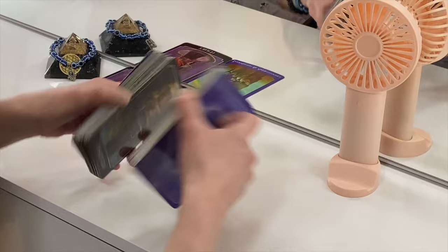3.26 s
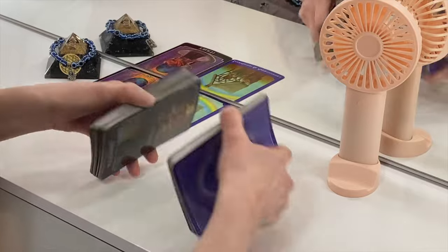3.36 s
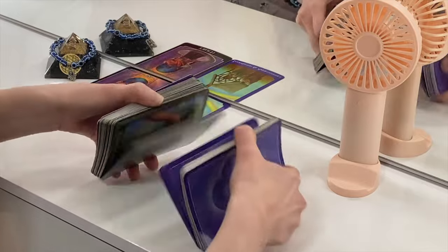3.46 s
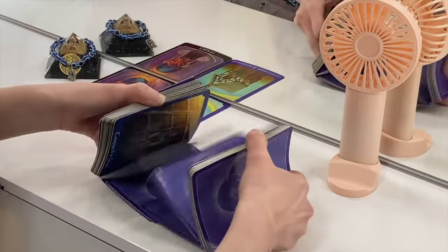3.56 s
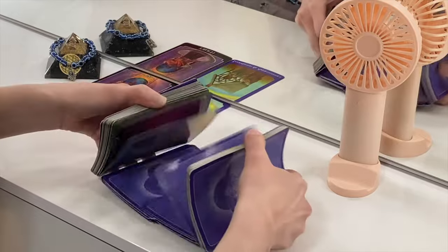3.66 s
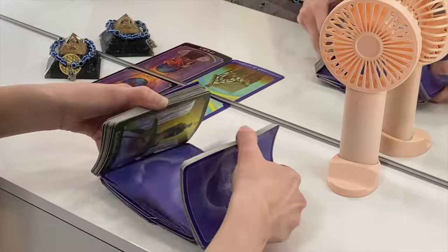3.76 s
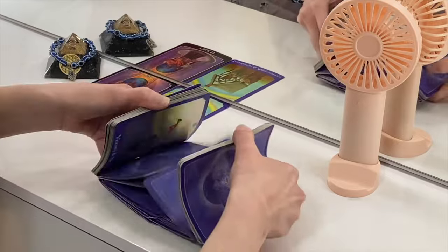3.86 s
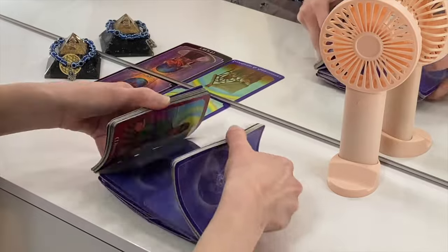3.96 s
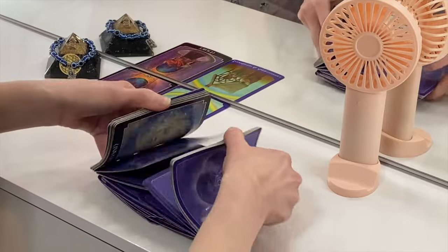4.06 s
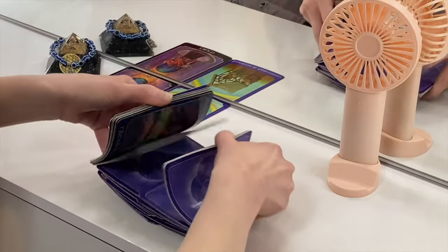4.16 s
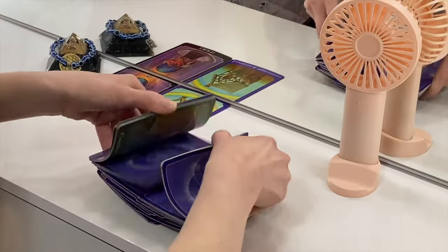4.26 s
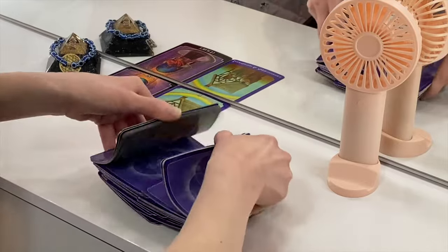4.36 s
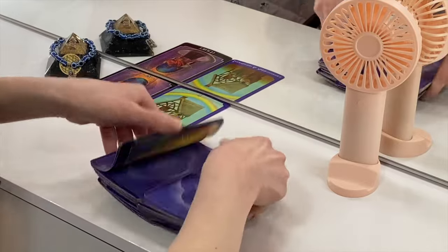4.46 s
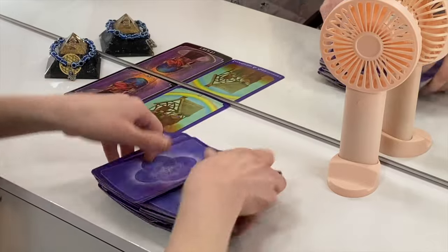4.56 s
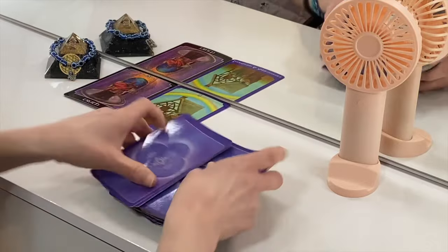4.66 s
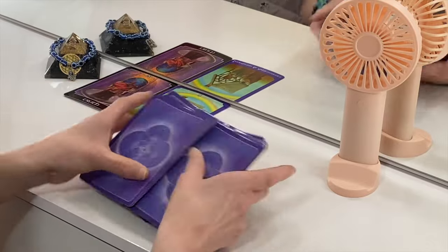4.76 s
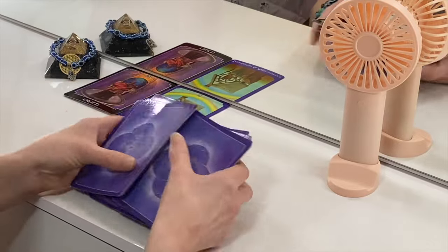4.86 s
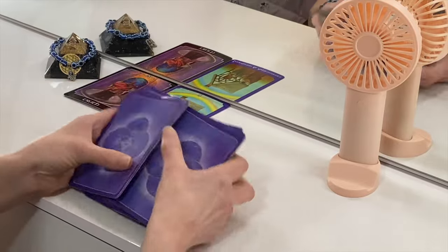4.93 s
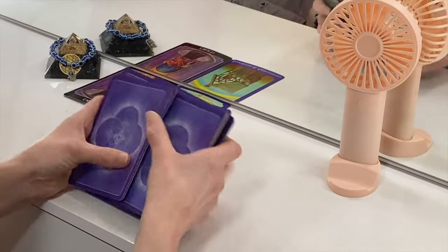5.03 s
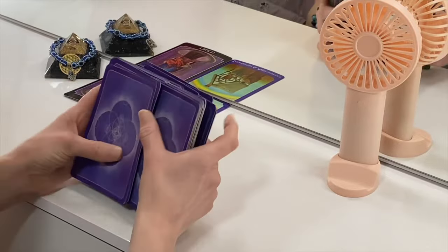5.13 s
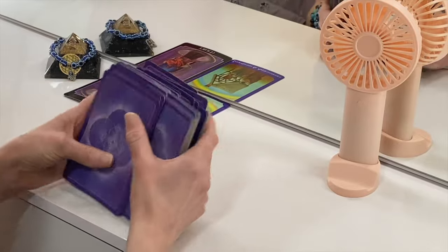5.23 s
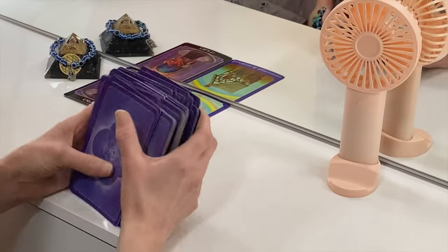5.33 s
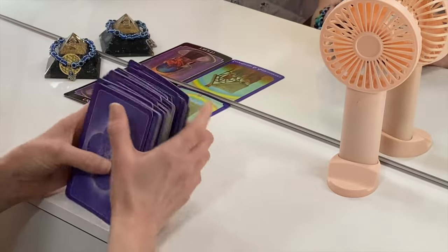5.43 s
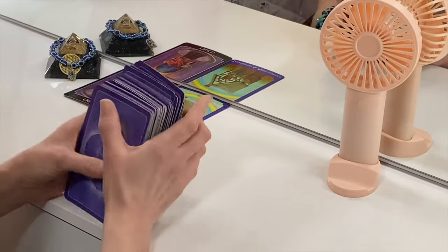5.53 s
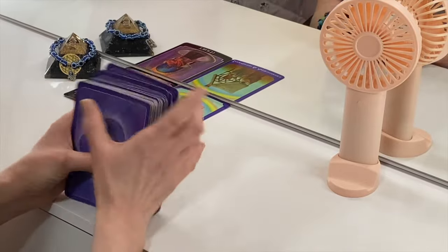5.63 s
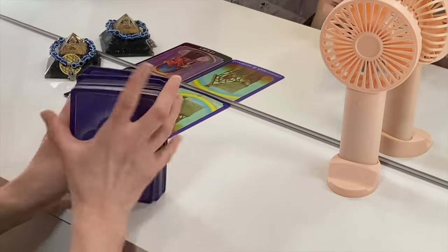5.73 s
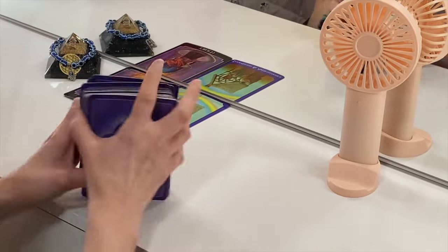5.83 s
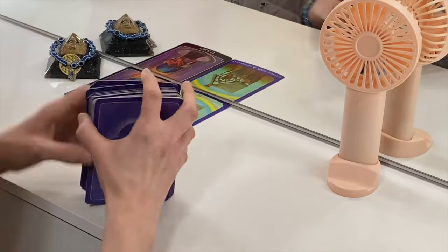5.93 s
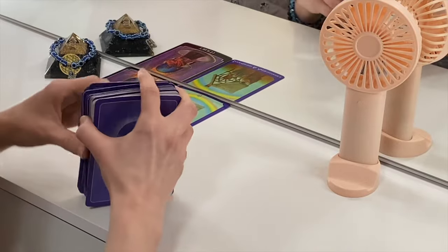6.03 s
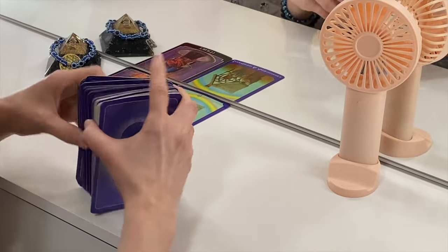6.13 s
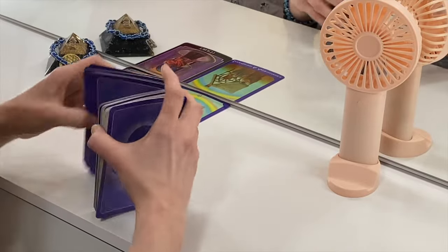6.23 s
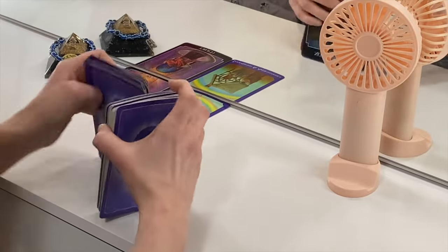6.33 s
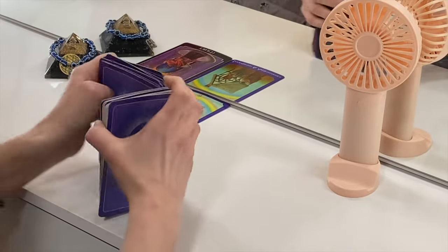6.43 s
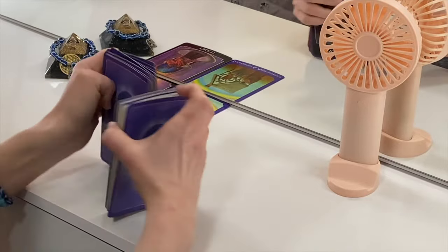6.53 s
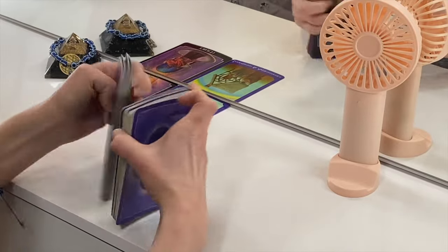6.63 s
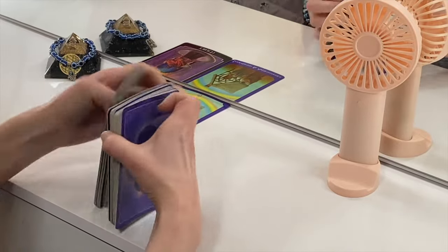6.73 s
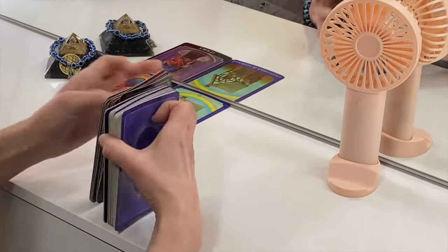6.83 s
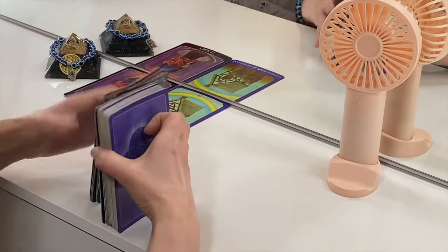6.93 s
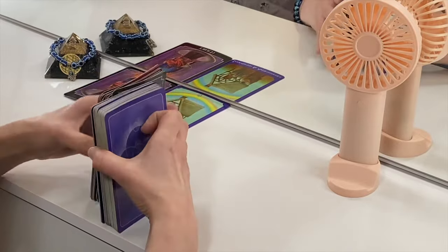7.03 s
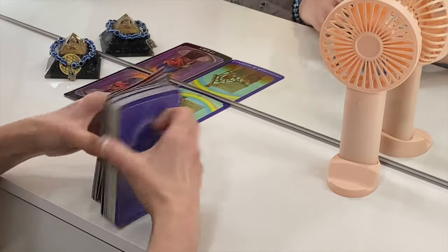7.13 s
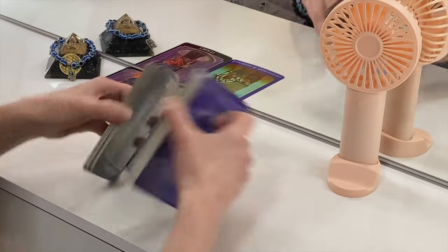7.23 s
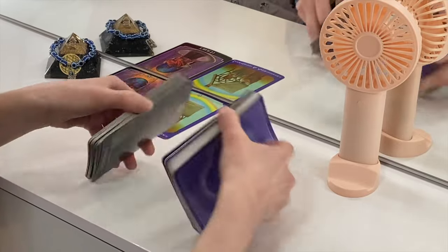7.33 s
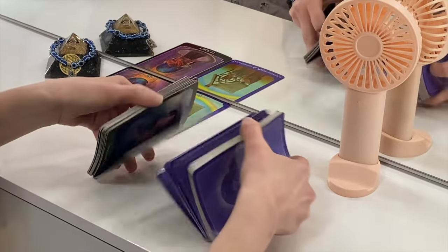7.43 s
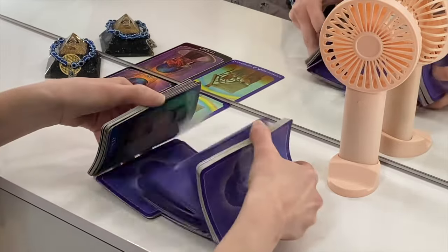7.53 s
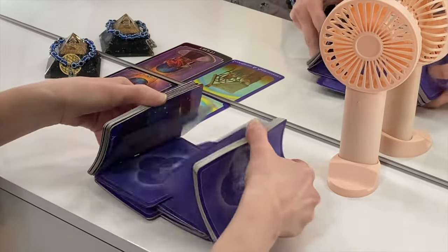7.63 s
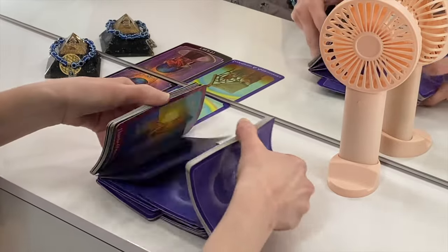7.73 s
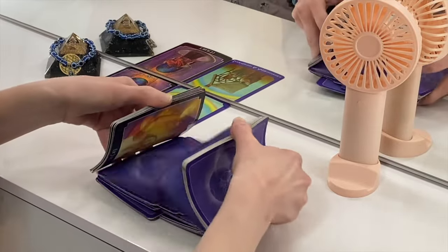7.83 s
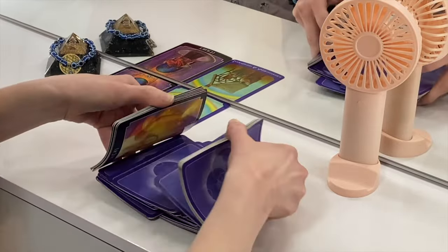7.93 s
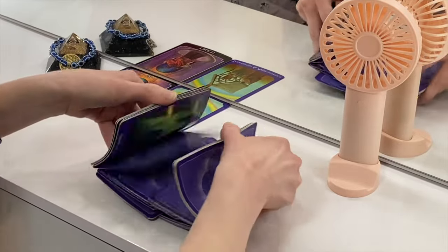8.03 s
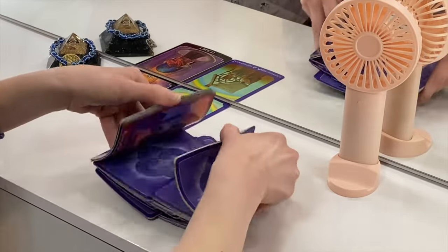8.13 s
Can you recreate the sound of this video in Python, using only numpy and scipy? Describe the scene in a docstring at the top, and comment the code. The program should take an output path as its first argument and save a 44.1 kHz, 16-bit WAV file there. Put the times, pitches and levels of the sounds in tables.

```python
"""Card deck on a table

A thick deck of stiff cards is riffled, squared and tapped on a hard table top, close up in a quiet room.
Each slap is a short flutter of clicks that rings the card and cracks in the treble.
Thuds are short rattling pushes that ring the pack and the table; sliding is gritty noise with bright ticks.
The room answers briefly in decaying noise bands; faint hiss and a low rumble lie underneath."""
import sys
import numpy as np
from scipy import signal
from scipy.fft import rfft, irfft, next_fast_len
from scipy.io import wavfile
from scipy.ndimage import uniform_filter1d

SR = 44100
rng = np.random.default_rng(int(sys.argv[2]) if len(sys.argv) > 2 else 0)


def amplitude_ratio(level_db):
    """Convert a level in decibels to the matching linear amplitude (field) ratio."""
    exponent = np.asarray(level_db, float) / 20
    return 10 ** exponent


def generate_wav(signal):
    """Clip the signal to [-1, 1] and save it as 16-bit WAV at the path in sys.argv[1]."""
    frames = np.transpose(np.atleast_2d(signal))
    scaled = np.clip(frames, -1, 1) * 32767
    pcm = np.round(scaled).astype(np.int16)
    wavfile.write(sys.argv[1], SR, pcm)


N = 361179
SPOTS = 6  # places on the table that share out the sounds


def level(x, db):
    """Sets the rms level."""
    return x * amplitude_ratio(db) / np.sqrt(np.mean(x ** 2))


def peak(x, db):
    """Sets the peak level."""
    return x * amplitude_ratio(db) / np.max(np.abs(x))


def steady(x, db, length_s):
    """Sets the rms level that the sound would have with all its energy spread over length_s."""
    return x * amplitude_ratio(db) / np.sqrt(np.sum(x ** 2) / (length_s * SR))


def colour(x, points):
    """Filters by (f/Hz, level/dB) points joined on a log axis, falling 18 dB per octave outside them."""
    hz, db = np.transpose(points)
    f = np.fft.rfftfreq(x.shape[-1], 1 / SR) + 1
    octaves_below = np.log2(np.maximum(hz[0] / f, 1))
    octaves_above = np.log2(np.maximum(f / hz[-1], 1))
    gain_db = np.interp(np.log(f), np.log(hz), db) - 18 * (octaves_below + octaves_above)
    return irfft(rfft(x) * amplitude_ratio(gain_db), x.shape[-1])


def ring(x, hz, width):
    """A two-pole resonance, gain near 1 at its centre; width in Hz."""
    r = np.exp(-np.pi * width / SR)
    return signal.lfilter([1 - r, 0, r - 1], [1, -2 * r * np.cos(2 * np.pi * hz / SR), r * r], x)


def decay_width(t60):
    """The bandwidth in Hz of a resonance that dies by 60 dB in t60 seconds."""
    return np.log(1000) / np.pi / t60


def lowpass(x, order, hz):
    """Takes the highs off, forward in time."""
    return signal.sosfilt(signal.butter(order, hz, fs=SR, output="sos"), x)


def grit(noise, spread_db):
    """Signed clicks of very uneven size, one chance each sample."""
    return noise[0] * amplitude_ratio(spread_db * noise[1])


# Slaps of card on card, from dull knocks of the whole pack to crisp snaps of one edge:
# [t/s, card level/dB, edge crack against card level/dB, flutter length/ms]
SLAPS = [(0.707, -69, -3, 12), (0.975, -75, 10, 2.1), (1.174, -68.5, -3, 3.6), (1.355, -50, -7, 6.3),
         (1.365, -36.5, -76, 2.7), (1.416, -41.5, -75, 4), (1.62, -45.5, -76, 2.7), (1.642, -37, -79, 3.9),
         (1.665, -37.5, -7.5, 1.15), (1.705, -33.5, -37, 1.9), (1.773, -39, -25.5, 18),
         (1.892, -43, -18, 5.8), (1.971, -62, 6, 1.1), (2.033, -60, 1.5, 6.6), (2.133, -36, -20.5, 5.9),
         (2.222, -41, -71, 2.9), (2.339, -55, -11, 7.8), (2.375, -25, -22, 5), (2.517, -44.5, -31, 3.2),
         (2.575, -34.5, -19.5, 0.84), (2.712, -56, -30, 8), (2.739, -45, -40, 3.5), (3.005, -65.5, -57, 12),
         (3.074, -58.5, -35, 2.1), (3.263, -49.5, 9.5, 0.51), (3.558, -29.5, -6, 5),
         (3.639, -34.5, -7.5, 1.8), (3.738, -44.5, 4.5, 1.7), (3.756, -41.5, -3, 1.3),
         (3.853, -43.5, 0.5, 1.6), (3.876, -21.5, -6.5, 3), (3.956, -26.5, -2, 2.1), (3.993, -27.5, 3, 1.4),
         (3.998, -23.5, -2, 2.1), (4.038, -33, -7, 3.5), (4.096, -44.5, 6.5, 4.4), (4.108, -29.5, -4, 4.3),
         (4.179, -60, 18, 1.3), (4.199, -36, -1.5, 6.3), (4.209, -40, -5, 4.4), (4.334, -33.5, 3.5, 10),
         (4.344, -23, -2.5, 2.7), (4.402, -35, 4, 6.7), (4.418, -21.5, 0, 3.7), (4.454, -17.5, 7, 0.56),
         (4.481, -17, -1.5, 1), (4.878, -52, -3.5, 9.5), (5.07, -47, -4.5, 5.7), (5.284, -32.5, -12, 4.7),
         (5.405, -31.5, -50, 1.9), (5.414, -29, -13, 1.34), (5.492, -42.5, -22, 5.9),
         (5.538, -18.5, -11, 1.25), (5.567, -25.5, -16, 2.85), (5.728, -37.5, -63.5, 2.2),
         (5.754, -46.5, -25, 3.5), (5.88, -57, -56, 5.7), (5.992, -45, -48.5, 8.2),
         (6.095, -50.5, -22.5, 4.6), (6.143, -48.5, -34, 6.9), (6.2, -49.5, -40, 16),
         (6.249, -34.5, -30.5, 9), (6.265, -27, -45, 0.65), (6.295, -33, -45, 1.8), (6.32, -72, 20, 1.5),
         (6.428, -34.5, -5.5, 4), (6.597, -46.5, -67, 2.8), (6.647, -38.5, -55, 1.9),
         (6.685, -39, -38, 4.1), (6.812, -42, -18, 8.4), (6.868, -35.5, -23.5, 12.9),
         (7.144, -34.5, -33, 2.32), (7.256, -47, 6.5, 0.99), (7.375, -55.5, -10, 4.1),
         (7.476, -53, 0.5, 2.3), (7.497, -26.5, -2, 1.1), (7.504, -20, -4, 0.95), (7.533, -23, -4, 1.85),
         (7.563, -30.5, 4.5, 1.3), (7.69, -42, 7, 4.6), (7.7, -39, -14, 3.1), (7.785, -27, -3.5, 0.53),
         (7.846, -41, 3, 3.5), (7.88, -37, 5, 1.7), (8.053, -35.5, -2, 3.6), (8.134, -23, -3.5, 7)]
# Bending modes of a card: [f/Hz, width/Hz, level/dB]
CARD_MODES = [(887, 885, 9.5), (1580, 130, -6), (2300, 1400, 9), (3560, 3300, 8)]
# Treble colour of a cracking edge: [f/Hz, level/dB]
CRACK = [(3200, 8), (7500, 7), (11000, 3), (15800, -1.5)]


def slaps():
    """Each slap swishes, lands in uneven contacts and settles; its clicks ring card modes and an air gap."""
    size, lead = 8192, 600  # samples: whole slap, swish before landing
    t = (np.arange(size) - lead) / SR
    after = np.maximum(t, 0)
    out = np.zeros((SPOTS, N + size))
    for k, (s, db, crack_db, flutter_ms) in enumerate(SLAPS):
        # the air gap under a card rings higher the harder and the crisper the slap
        octaves = (db + 22) / 57.5 + crack_db / 45.5
        gap_hz = np.clip(1762 * 2 ** octaves, 600, 3000)
        noise = rng.standard_normal((4, size))
        span = max(flutter_ms, .5) / 1000
        contacts = amplitude_ratio(4 * np.repeat(noise[2], 60)[:size])
        landing = (1 - np.exp(-after / (0.00077 + 0.024 * span))) / (1 + (after / span) ** 1.76) * contacts
        # in a short slap the first corner to touch hits hardest
        landing = landing * (1 + 0.017 / span * np.exp(-after / 0.00052))
        swish = amplitude_ratio(-20.5) * np.exp(np.minimum(t, 0) / 0.0045) * (t < 0)
        edges = amplitude_ratio(8 * np.repeat(noise[3], 90)[:size])
        settling = amplitude_ratio(-33.5) * np.exp(-after / 0.036) * (t > 0) * edges
        clicks = grit(noise, 5) * (swish + landing + settling)
        # each card bends a little differently, and the squeezed air gap picks which modes speak
        bend = 1 + 0.0098 * noise[2, -len(CARD_MODES):]
        card = sum(amplitude_ratio(c) * ring(clicks, b * f, w) for b, (f, w, c) in zip(bend, CARD_MODES))
        card = lowpass(ring(card, gap_hz, 3.6 * gap_hz), 4, 600 + 1.74 * gap_hz)
        crack = colour(clicks, CRACK)
        i = int(s * SR) - lead - 20
        out[k % SPOTS, i:i + size] += steady(card, db, span) + steady(crack, db + crack_db, span)
    return out[:, :N]


# The pack knocks on the table or on itself; its pitch depends on the grip:
# [t/s, peak level of the pack/dB, pitch f/Hz]
THUDS = [(1.367, -31.5, 310), (1.618, -44.5, 330), (1.667, -34.5, 327), (1.785, -32.5, 2300),
         (1.92, -39, 398), (1.948, -41, 412), (2.134, -35, 305), (2.374, -41.5, 260), (2.377, -19.5, 2440),
         (2.574, -40, 323), (3.073, -48.5, 390), (3.557, -33, 298), (3.879, -25, 1170), (4.0, -23, 1223),
         (4.453, -34, 289), (5.211, -47.5, 121), (5.292, -30, 363), (5.543, -36.5, 310),
         (5.731, -33.5, 836), (5.75, -40, 324), (6.086, -40, 342), (6.254, -34.5, 303), (6.597, -33, 284),
         (6.651, -38.5, 358), (6.812, -36, 299), (6.872, -27.5, 1076), (7.383, -34.5, 304.3),
         (7.502, -31.5, 333), (8.049, -39.5, 418)]
# Table top resonances: [f/Hz, level before weighting by decay time/dB, t60/s]
TABLE = [(122.4, 0.5, 0.18), (205, 5.5, 0.016), (298, -20.5, 0.047), (385, -16.5, 0.16)]


def thuds():
    """A short push and its rattle ring pack and table top; low knocks reach the table best."""
    size = 16384
    pack_q = 5.5  # sharpness of each of the pack's two resonances
    t = np.arange(size) / SR
    out = np.zeros((SPOTS, N + size))
    for k, (s, db, pack_hz) in enumerate(THUDS):
        rattle = amplitude_ratio(-15) * rng.standard_normal(size) * np.exp(-t / 0.015)
        push = lowpass(np.exp(-t / 0.00044) + rattle, 2, 2 * pack_hz)
        width = pack_hz / pack_q
        pack = ring(ring(push, pack_hz, width), pack_hz, width)
        table = sum(amplitude_ratio(c) * ring(push, f, decay_width(t60)) * t60 for f, c, t60 in TABLE)
        table_db = db + 2 - 4 * np.log2(pack_hz / TABLE[0][0])
        i = int(s * SR)
        out[k % SPOTS, i:i + size] += peak(pack, db) + peak(table, table_db)
    return out[:, :N]


# Dull colour of card faces rubbing: [f/Hz, level/dB]
SLIDE = [(450, -2), (1000, -1.5), (2500, -2.5)]


def sliding(db):
    """Card faces rub in a dull hush that comes in fits; edges catch in lone bright ticks."""
    ticks_per_s, tick_s = 70, 0.00087  # rate over all spots, decay time constant
    k = int(SR / 70)  # samples in one fit
    fits = uniform_filter1d(np.repeat(rng.standard_normal((SPOTS, N // k + 1)), k, axis=1), k)[:, :N]
    rub = grit(rng.standard_normal((2, SPOTS, N)), 4.6) * amplitude_ratio(10.55 * fits)
    chance = rng.random((2, SPOTS, N))
    catch_size = amplitude_ratio(-3.5 * np.log(1 - chance[1]))
    catches = (chance[0] < ticks_per_s / SPOTS / SR) * catch_size
    envelope = signal.lfilter([1], [1, -np.exp(-1 / (tick_s * SR))], catches)
    ticks = envelope * rng.standard_normal((SPOTS, N))
    hush = level(colour(rub, SLIDE), -5.0) + level(colour(rub, CRACK), -12.5)
    return amplitude_ratio(db) * (hush + level(colour(ticks, CRACK) + colour(ticks, SLIDE), -4))


# Echo bands of the table and near walls: [f/Hz, t60/s, relative level/dB]
ROOM = [(294, 0.36, 3.5), (820, 0.18, 5), (1580, 0.31, 1), (4400, 0.28, 2.5), (6700, 0.47, -10.5),
        (13700, 0.27, 3)]
# Colour of the echo's side against its mid: [f/Hz, level/dB]
ROOM_WIDTH = [(125, -10), (500, -3.5), (1200, 1.5), (2500, -18.5), (13000, -36.5)]


def room(x):
    """Table and near walls answer at once; each band dies at its own rate, a little wider than the source."""
    t = np.arange(int(.6 * SR)) / SR
    tail = 0
    for hz, t60, db in ROOM:
        band = ring(rng.standard_normal((2, len(t))), hz, 0.64 * hz)
        tail = tail + amplitude_ratio(db - 60 * t / t60) * band
    tail = tail * (1 - np.exp(-t / 0.00014))
    tail = tail / np.sqrt(np.sum(tail[0] ** 2))  # unit energy in the mid
    mid = signal.fftconvolve(x, tail[0])[:N]
    side = signal.fftconvolve(x, colour(tail[1], ROOM_WIDTH))[:N]
    return np.array([mid + side, mid - side])


# Colour of the room hiss: [f/Hz, relative level/dB]
HISS = [(120, 0), (300, -7.5), (1600, -24.5), (6560, -29), (16000, -35.5)]
# Colour of the rumble: [f/Hz, relative level/dB]
RUMBLE = [(50, -5.5), (62, -3.5), (110, -7)]


def background(handling):
    """Faint room hiss, and a low rumble that swells while the hands work on the table."""
    noise = rng.standard_normal((4, N))
    hiss = level(colour(noise[:2], HISS), -78.5)
    shake = lowpass(handling ** 2, 1, 1.6)  # slow power of the handling
    swell = amplitude_ratio(-70.0) + amplitude_ratio(-26.5) * np.abs(shake) ** 0.36
    rumble = level(colour(noise[2:], RUMBLE), 0) * swell
    mid = hiss[0] + rumble[0]
    side = 0.31 * hiss[1] + 0.15 * rumble[1]
    return np.array([mid + side, mid - side])


# Handling over time: [t/s, sliding level before the treble gain/dB, treble gain above 7 kHz for all cards/dB]
HANDS = [(0, -105, -18), (1.27, -94.5, 12.5), (1.345, -72.5, -1.5), (1.56, -93, -4), (1.899, -70, -9.5),
         (2.06, -84.5, 1.5), (2.901, -86, -8.5), (3.448, -86, 6), (3.898, -61.5, -5), (4.3, -70.5, 3),
         (4.501, -54.5, -3.5), (4.799, -82.5, -1), (5.498, -59.5, -8.5), (5.931, -81.5, -1.5),
         (6.3, -79, 0.5), (6.9, -66, -8), (7.08, -94.5, -12), (7.301, -90.5, 5), (7.6, -68, -5.5),
         (8.19, -63.5, 1.5)]


def scene():
    """Cards close by, the table under them, their room echo and the background."""
    t = np.arange(N) / SR
    s, slide_db, treble_db = np.transpose(HANDS)
    cards = slaps() + sliding(np.interp(t, s, slide_db))
    low = signal.sosfiltfilt(signal.butter(3, 7000, fs=SR, output="sos"), cards)
    cards = low + amplitude_ratio(np.interp(t, s, treble_db)) * (cards - low)
    # the slaps shake the table a little too
    shaken = amplitude_ratio(15) * sum(ring(cards, f, decay_width(t60)) for f, _, t60 in TABLE)
    spots = cards + thuds() + shaken
    near = spots.sum(axis=0)
    # a spot off centre reaches one microphone port a fraction of a sample early
    early = 0.34 * np.cos(np.pi * np.arange(SPOTS) / (SPOTS - 1))  # samples
    lag = early @ np.gradient(spots, axis=1)
    echo = amplitude_ratio(-3.5) * sum(room(x) for x in spots)  # every spot has its own echo pattern
    return near + np.array([lag, -lag]) + echo + background(near)


def top_cut(x):
    """Nothing passes above the cut-off."""
    return signal.sosfilt(signal.butter(12, 16990, fs=SR, output="sos"), x)


# Narrow dips in the treble: [f/Hz, width/Hz, level/dB]
DIPS = [(8650, 200, -11.5), (14500, 100, -6.5)]


def record(dry):
    """The treble has two narrow dips and a hard top; above 7.5 kHz left and right drift apart in phase."""
    size = next_fast_len(N + 4096)
    f = np.fft.rfftfreq(size, 1 / SR)
    dips_db = sum(d * np.exp(-((f - hz) / w) ** 2) for hz, w, d in DIPS)
    top_db = -60 * np.clip((f - 16200) / 700, 0, 1)
    turn = np.exp(-2j * np.pi * np.maximum(f - 7500, 0) * .00028)
    spectrum = rfft(dry, size) * amplitude_ratio(dips_db + top_db) * np.array([turn, np.ones_like(turn)])
    mix = irfft(spectrum, size)[:, :N]
    return top_cut(mix)


dry = scene()
out = record(dry)
generate_wav(out)
```